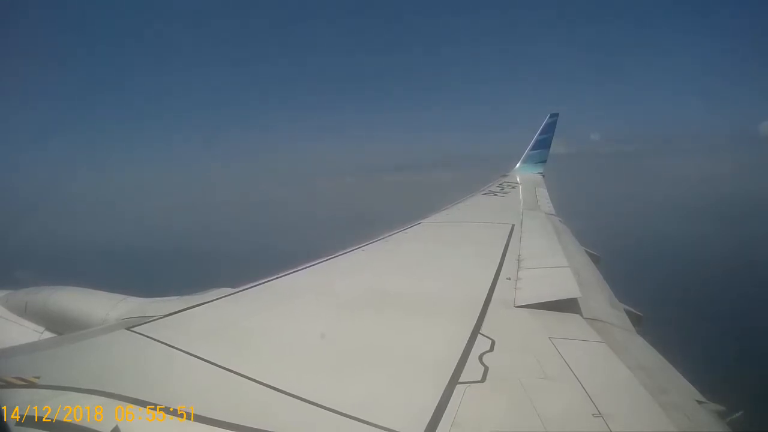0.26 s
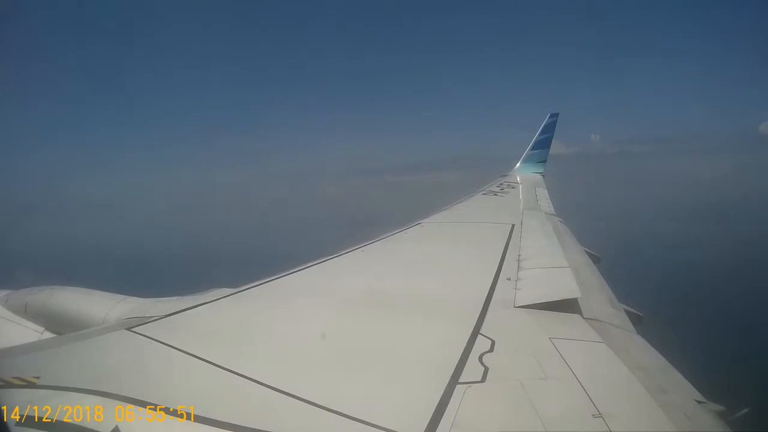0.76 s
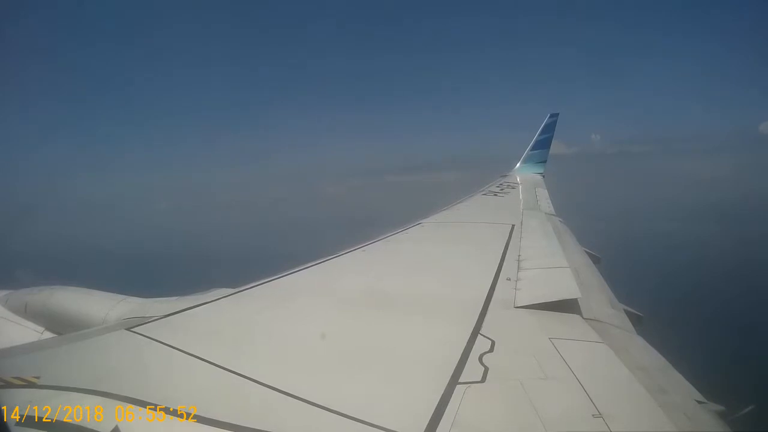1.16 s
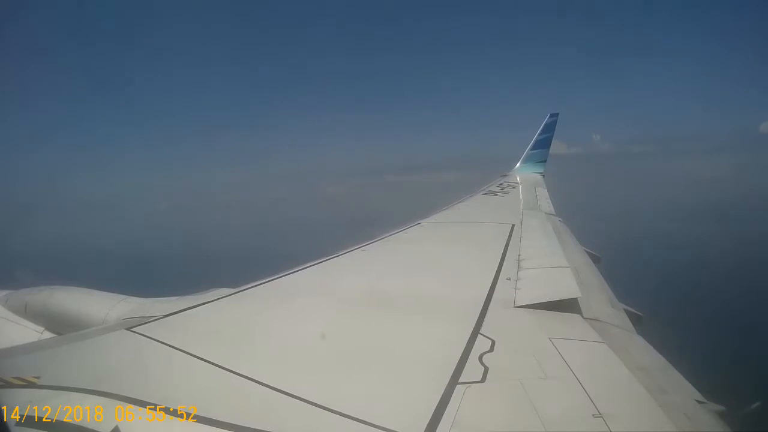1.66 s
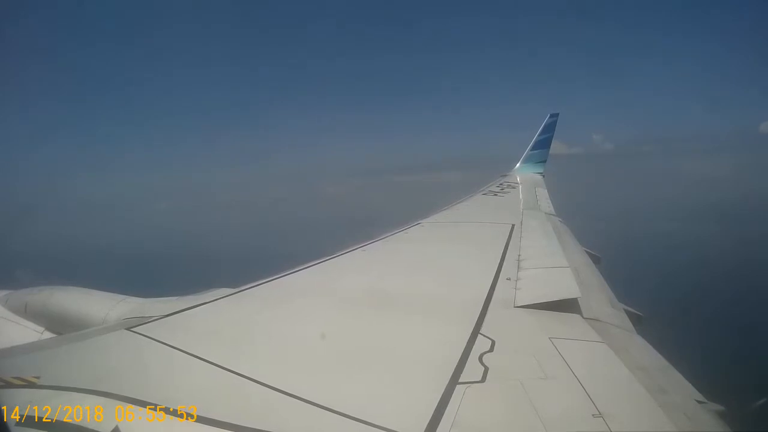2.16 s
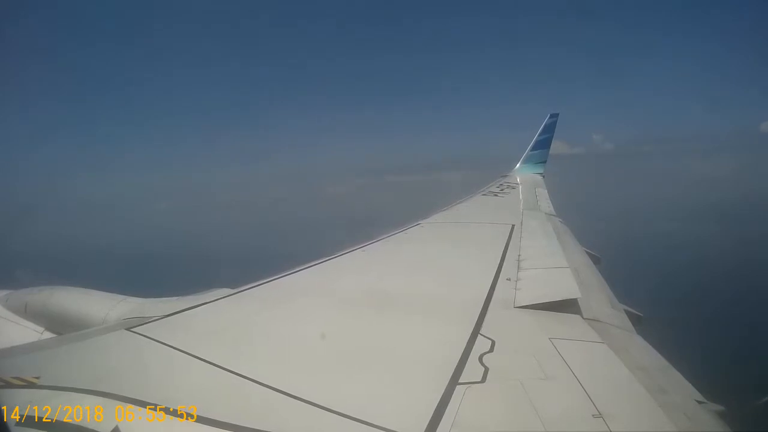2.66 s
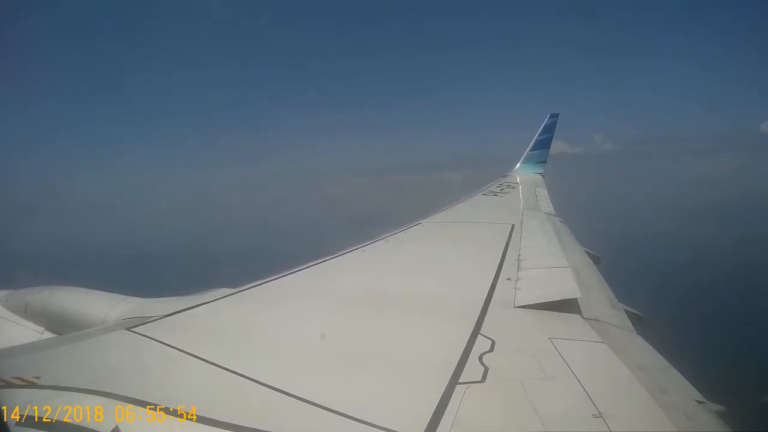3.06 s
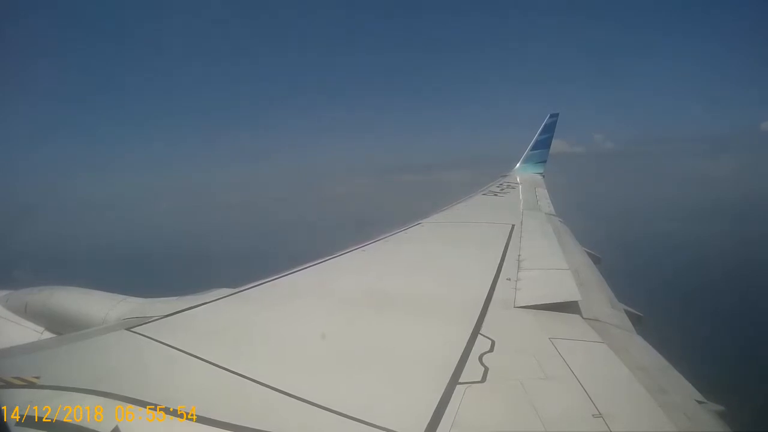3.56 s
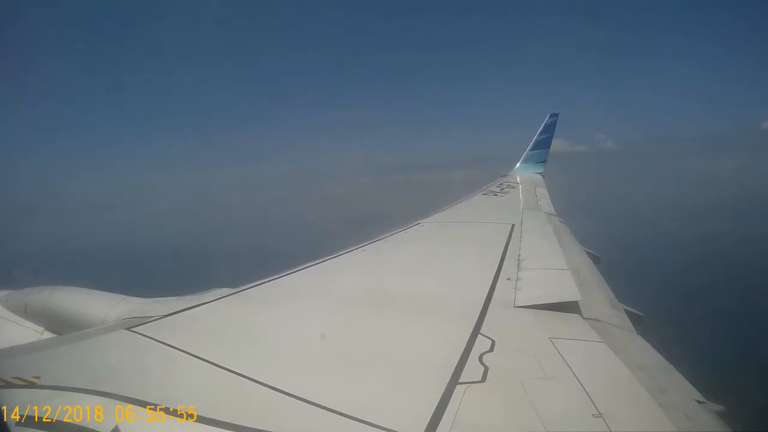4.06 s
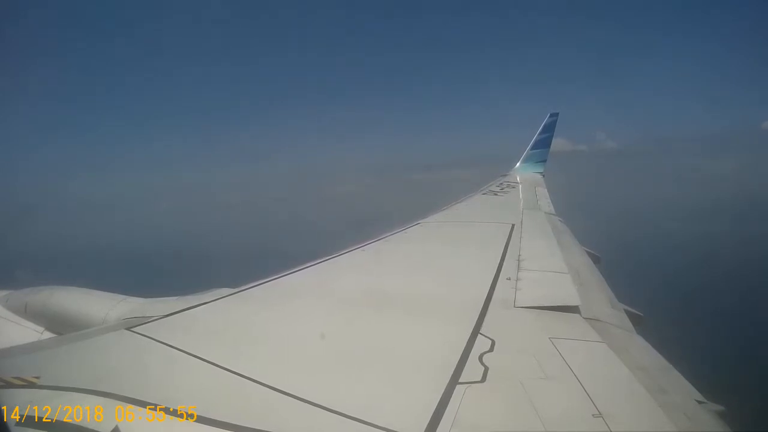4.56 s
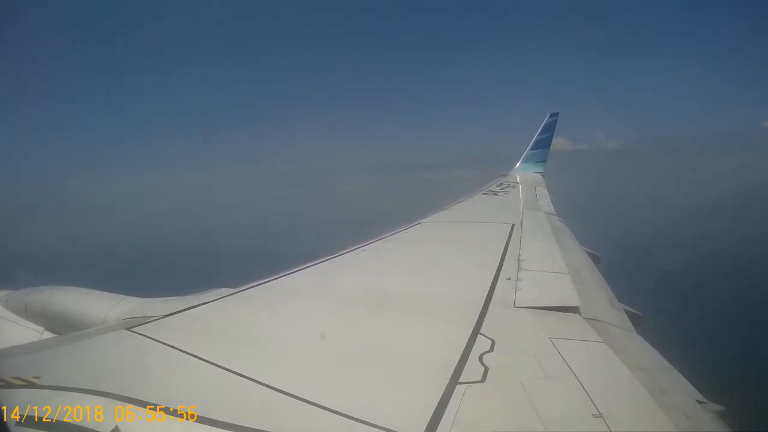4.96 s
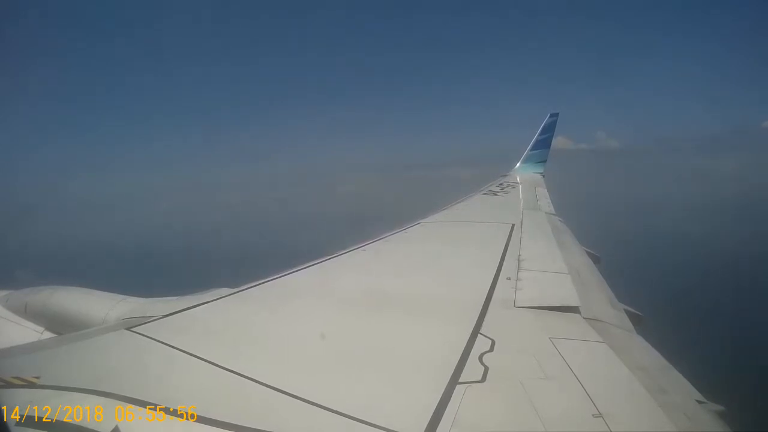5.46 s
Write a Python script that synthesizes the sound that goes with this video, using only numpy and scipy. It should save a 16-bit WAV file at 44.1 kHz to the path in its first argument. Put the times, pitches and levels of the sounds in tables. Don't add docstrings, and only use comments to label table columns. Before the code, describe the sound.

Inside a cruising airliner, a dense, muffled low roar of airflow and engines runs throughout, with a thin steady hum inside it. Low buffeting swells and eases, calming after four seconds. A small camera held at the window adds faint hiss and brief treble dropouts; its plastic body ticks occasionally, and a fingertip knocks it near the end.

```python
import sys
import numpy as np
from scipy import signal
from scipy.fft import rfft, irfft
from scipy.io import wavfile
from scipy.ndimage import uniform_filter1d

SR = 44100
rng = np.random.default_rng(int(sys.argv[2]) if len(sys.argv) > 2 else 0)


def dump(signal):
    limited = np.clip(np.atleast_2d(signal).T, -1, 1)
    pcm = np.round(limited * 32767).astype(np.int16)
    wavfile.write(sys.argv[1], SR, pcm)


def gain_from_decibels(decibels):
    exponent = np.asarray(decibels, float) / 20
    return 10 ** exponent


N = 251370


def evened(x):
    return x / np.sqrt(np.mean(x ** 2) + 1e-20)


def spectrum_db(points, hz):
    table_hz, level_db = np.transpose(points)
    return np.interp(np.log(hz + 1), np.log(table_hz + 1), level_db)


def coloured(points, size=N):
    hz = np.fft.rfftfreq(size, 1 / SR)
    inside = (hz >= points[0][0]) & (hz <= points[-1][0])
    spectrum = rfft(rng.standard_normal(size)) * gain_from_decibels(spectrum_db(points, hz)) * inside
    return evened(irfft(spectrum, size))


def drift(top_hz):
    t = np.arange(N) / SR
    return evened(sum(np.sin(2 * np.pi * (hz * t + rng.random())) / np.sqrt(hz)
                      for hz in np.geomspace(.1, top_hz, 12)))


def resonate(x, hz, width_hz):
    radius = np.exp(-np.pi * width_hz / SR)
    poles = [1, -2 * radius * np.cos(2 * np.pi * hz / SR), radius * radius]
    return (1 - radius) * signal.lfilter([1, 0, -1], poles, x)


def ring(x, hz, width_hz):
    return resonate(resonate(x, hz, width_hz), hz, width_hz)


def bumpy_gain(level_db, share):
    # time_s, level_db
    bumps = [
        (0, 4),
        (.6, -1),
        (1.2, 2.5),
        (2.4, 1),
        (3.0, 3.5),
        (3.55, 4),
        (3.9, -1.5),
        (5.1, -7),
        (5.7, -7.5),
    ]
    time_s, bump_db = np.transpose(bumps)
    return gain_from_decibels(level_db + share * np.interp(np.arange(N) / SR, time_s, bump_db))


def rattle(per_s=220, spread_db=4.0):
    # pitch_hz, width_hz, level_db
    trim = [(3200, 500, -9), (3900, 400, 0), (4250, 300, 0), (4850, 350, -5), (6600, 500, -20)]
    busy = gain_from_decibels(5.0 * evened(uniform_filter1d(rng.standard_normal(N), size=900)))
    strength = gain_from_decibels(spread_db * np.minimum(rng.exponential(1, N), 3)) * rng.choice([-1, 1], N)
    touches = strength * (rng.random(N) < per_s * busy / SR)
    modes = sum(gain_from_decibels(db) * width_hz * ring(touches, hz, width_hz) for hz, width_hz, db in trim)
    return bumpy_gain(-68.5, 0.65) * evened(modes)


def ticks():
    # start_s, level_db, tilt_db_per_octave, ring_s
    tick_table = [
        (.553, -57, -7, .02),
        (.797, -57, -4.5, .024),
        (1.409, -61.5, -4, .01),
        (2.5606, -49, -2, .01),
        (2.5682, -49.5, -2, .012),
        (2.746, -60, 1, .01),
        (2.9, -62, -1, .01),
        (3.519, -63, -5.5, .02),
        (5.249, -48.5, 3, .028),
        (5.395, -54, -3, .02),
    ]
    # pitch_hz, level_db
    case = [(800, -40), (2500, -5), (3850, 0), (4500, -4), (5600, -16), (6600, -8), (7300, -15),
            (9000, -14), (12000, -15), (14000, -26)]
    # pitch_hz, width_hz, level_db
    knock_modes = [(880, 32, 0), (1176, 45, -5), (3100, 200, -22)]
    knock_s, knock_db = 5.249, -25
    out, t = np.zeros(N), np.arange(3000) / SR
    rise = 1 - np.exp(-t / .0005)
    for start_s, level_db, tilt_db, ring_s in tick_table:
        colour = [(hz, db + tilt_db * np.log2(max(hz / 4000, 1))) for hz, db in case]
        burst = gain_from_decibels(level_db) * coloured(colour, size=len(t)) * np.exp(-3 * t / ring_s)
        out[round(start_s * SR):][:len(t)] += burst * rise
    knock = sum(gain_from_decibels(db - 27 * width_hz * t) * np.sin(2 * np.pi * hz * t)
                for hz, width_hz, db in knock_modes)
    out[round(knock_s * SR):][:len(t)] += gain_from_decibels(knock_db) * knock * rise
    return out


def machine(hz, orders, levels_db, wander, waver_db=.4):
    turns = np.cumsum(hz * (1 + wander * drift(3.0))) / SR
    tones = sum(gain_from_decibels(db) * np.sin(2 * np.pi * (order * turns + rng.random()))
                for order, db in zip(orders, levels_db))
    return np.sqrt(2) * tones * gain_from_decibels(waver_db * drift(2.9))


def machines():
    # orders, level_db of each order, wander of its speed as a share
    supply = (1, 3, 4, 5), (-31, -61, -61, -64), .0
    pump = (6, 7, 11.5, 12, 18), (-51, -63, -83, -81, -87), .0003
    vent = (1, 3), (-52, -75), .0006
    shaft = (1,), (-27,), .003
    fan = (1, 2), (-57, -77), .0007
    whine = (1, 1.2), (-63, -66), .0007
    fans_hz = 1467.7, 1477.5
    steady = machine(399.76, *supply) + machine(249.86, *pump) + machine(875.1, *vent)
    engines = machine(172.9, *shaft) + sum(machine(hz, *fan) for hz in fans_hz)
    gears = machine(1765, *whine)
    return steady + engines + gears


def airflow():
    # pitch_hz, level_db per hertz
    buffet_spectrum = [(8, -25), (16, -9), (26, -2), (38, -2), (46, 0), (56, -4), (68, -8), (85, -25),
                       (120, -60)]
    roar_spectrum = [(50, -28), (68, -16), (80, -7), (105, -8), (126, -0.5), (140, -2), (185, -2),
                     (210, -8.5), (254, 0), (275, -3), (345, -6), (362, -11), (400, -9.5), (430, -14.5),
                     (620, -42.5)]
    rush_spectrum = [(300, -32), (430, -8.5), (540, -3), (726, -8.5), (820, -6), (931, -11.5),
                     (1210, -12.5), (1400, -17.5), (1680, -20.5), (1950, -22), (2170, -21), (2600, -29.5),
                     (2860, -35.5), (3100, -42), (4000, -58)]
    buffet = bumpy_gain(-32, 0.94) * coloured(buffet_spectrum)
    roar = bumpy_gain(-17.5, .18) * coloured(roar_spectrum)
    rush = bumpy_gain(-34.5, 0.043) * coloured(rush_spectrum)
    haystack = gain_from_decibels(-50) * evened(ring(rng.standard_normal(N), 1508, 130))
    overtone = gain_from_decibels(-72.5) * evened(ring(rng.standard_normal(N), 2960, 130))
    return buffet + roar + rush + haystack + overtone


def scene():
    return (rattle() + ticks() + machines() + airflow())[None]


def self_noise():
    # pitch_hz, level_db per hertz
    hiss = [(2000, -11.5), (3300, 0), (3650, -1), (3950, 2.5), (4280, 2), (4550, -5), (4900, -7.5),
            (5150, -9), (8000, -11), (14300, -12.5), (15000, -16.5), (15700, -24.5)]
    return gain_from_decibels(-63) * coloured(hiss)


def lose_treble(x):
    # centre_s, edge_hz
    gaps = [(.0452, 2450), (.4932, 2800), (.7279, 2750), (1.2399, 2800), (1.6879, 2400), (1.8159, 2300),
            (2.3919, 2550), (2.9679, 2400), (3.3946, 2500), (5.5279, 3100)]
    hop = 941
    window = np.sin(np.pi * (np.arange(2 * hop) + .5) / (2 * hop))
    for start_s, edge_hz in gaps:
        centre = round(start_s * SR)
        near = slice(centre - hop, centre + hop)
        above = signal.firwin(1001, edge_hz, window=("kaiser", 10), pass_zero=False, fs=SR)
        treble = signal.oaconvolve(window * x[near], above, "same")
        mirror = np.r_[-treble[:hop][::-1], treble[hop:][::-1]]
        x[near] -= window * (treble + mirror)
    return x


def top_cut(x):
    return signal.sosfilt(signal.butter(12, 15760, fs=SR, output="sos"), x)


def record(dry):
    noisy = dry[0] + self_noise()
    mix = lose_treble(noisy)[None]
    return top_cut(mix)


dry = scene()
out = record(dry)
dump(out)
```